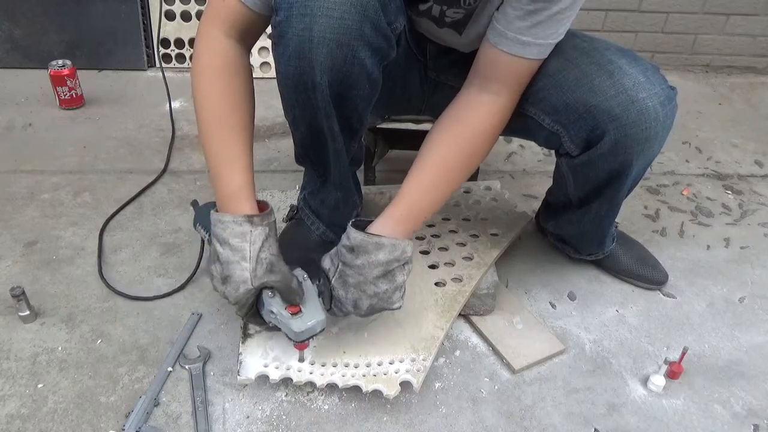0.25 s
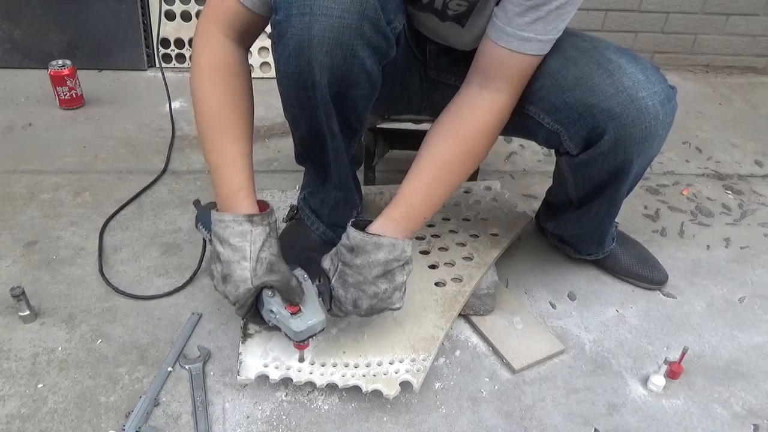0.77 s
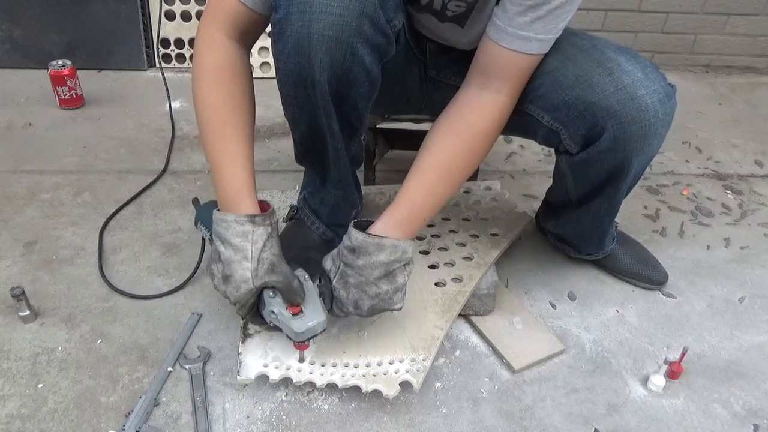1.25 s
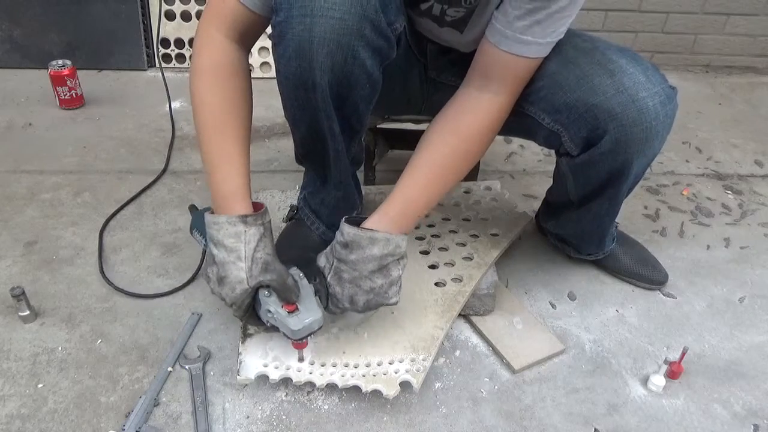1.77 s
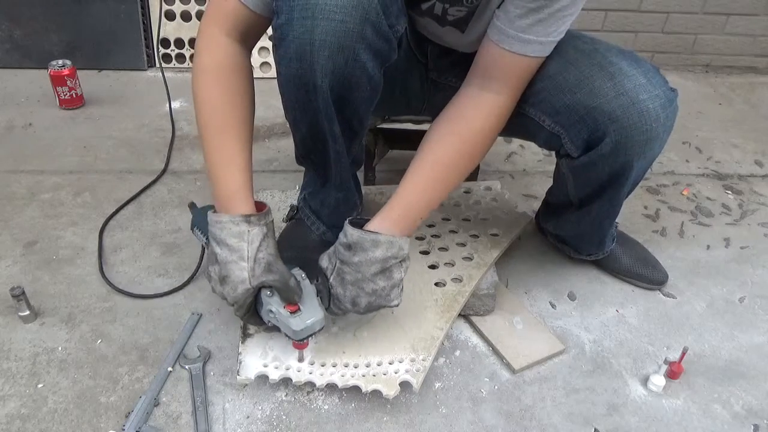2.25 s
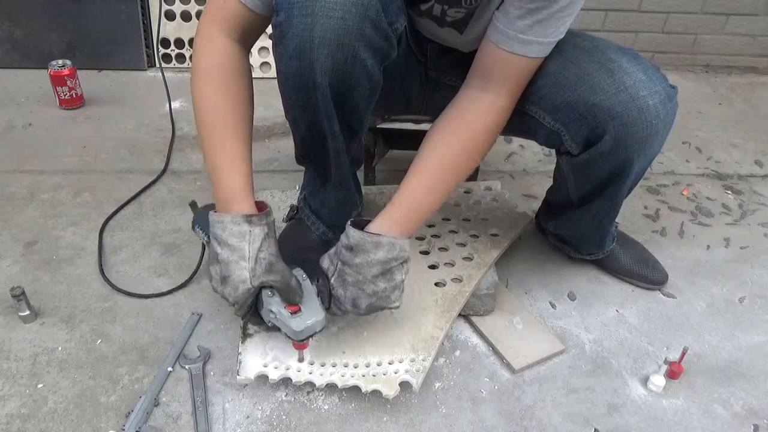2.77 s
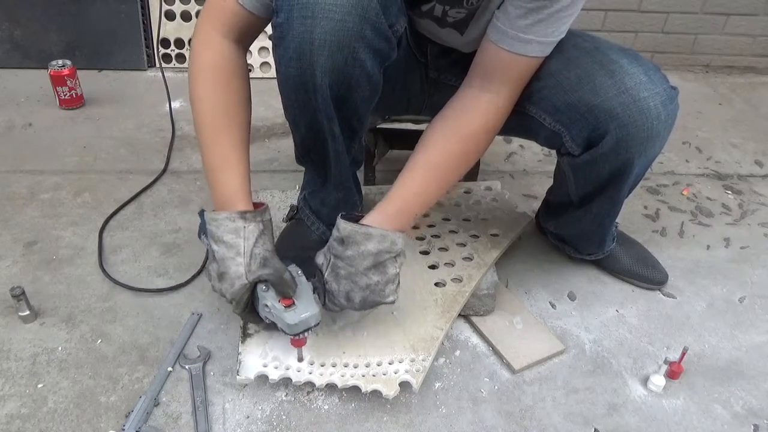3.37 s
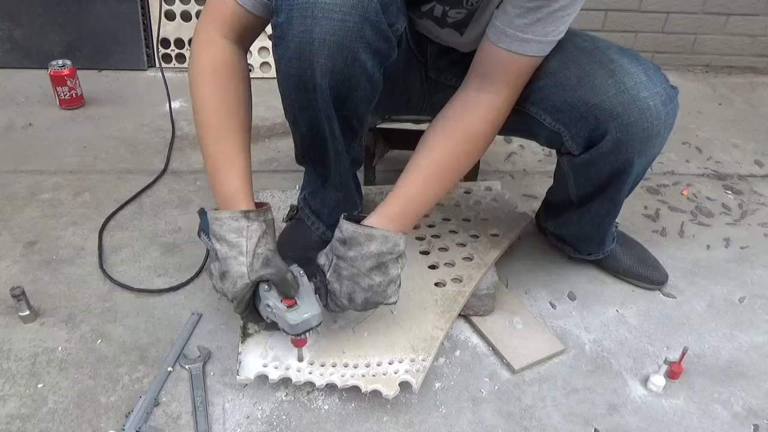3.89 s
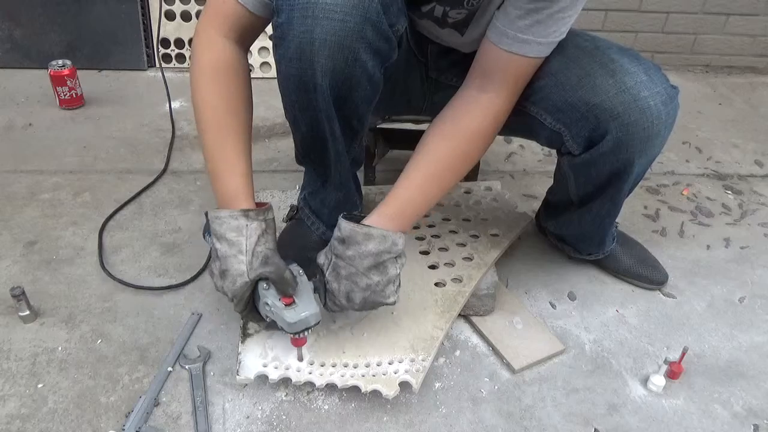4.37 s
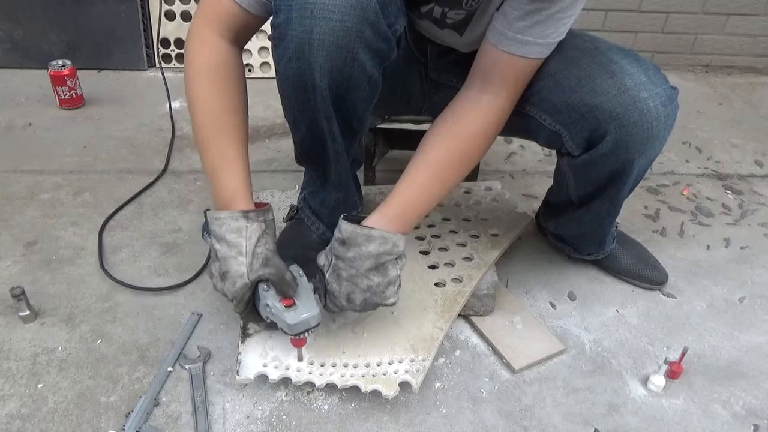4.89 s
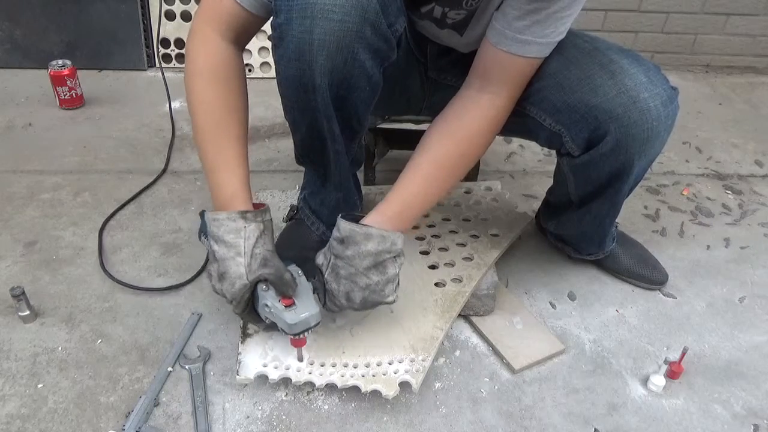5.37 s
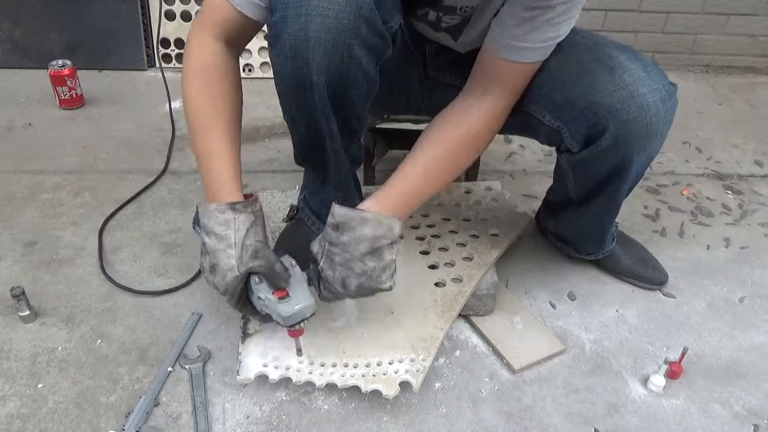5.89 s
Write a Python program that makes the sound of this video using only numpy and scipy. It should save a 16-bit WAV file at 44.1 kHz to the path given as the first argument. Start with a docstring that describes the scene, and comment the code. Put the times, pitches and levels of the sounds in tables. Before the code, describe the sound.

A continuous dense grinding screech: a diamond bit circling in ceramic tile, rough and metallic-bright, with small swells and dips, rattling and a noisy squeal over gear and fan hiss. After more than five seconds it bursts through; the tile suddenly stops ringing and the unloaded grinder whooshes on, louder in its hiss, with a brief light scrape. Close pickup in an open yard, levelled loudness, slight diffuse reflections from ground and wall.

```python
"""An angle grinder drives a diamond bit into a hard tile lying on concrete, in the open near a wall.
Grit scratches the tile into ringing (noise through resonators) as the tool is led round in small circles.
The bit rattles and squeals (noise-modulated lines); fan and gears hiss above (coloured noise).
Near the end the bit breaks through, grazes the hole and the tile falls silent; the freed tool hisses on."""
import sys
import numpy as np
from scipy import signal
from scipy.fft import rfft, irfft
from scipy.io import wavfile
from scipy.ndimage import uniform_filter1d

SR = 44100
rng = np.random.default_rng(int(sys.argv[2]) if len(sys.argv) > 2 else 0)


def wrap_up_sound(samples):
    """Save the sound to the file named by the first command line argument, as 16-bit audio."""
    columns = np.atleast_2d(samples).T
    # keep every value between -1 and 1, then stretch to whole-number steps
    tamed = np.clip(columns, -1, 1)
    steps = np.round(tamed * 32767).astype(np.int16)
    wavfile.write(sys.argv[1], SR, steps)


def voltage_ratio(level):
    """Linear amplitude factor for a level in decibels (scalar or array-like)."""
    return 10 ** (np.asarray(level, float) / 20)


N = 270774
T_S = np.arange(N) / SR
SPINDLE_HZ = 154.6
BREAK_S = 5.625  # the bit breaks through


def rms_one(x):
    """Scale to rms 1."""
    return x / np.sqrt(np.mean(x ** 2) + 1e-20)


def in_time(rows):
    """Interpolate the columns of a table that starts with time [s], one value per sample."""
    s, *columns = np.transpose(rows)
    return [np.interp(T_S, s, c) for c in columns]


def coloured(x, points, scale=1):
    """Filter by a spectrum of (frequency [Hz], level [dB]) points, the dB multiplied by scale."""
    hz, level_db = np.transpose(points)
    grid_hz = np.maximum(np.arange(N // 2 + 1) * SR / N, 1)
    gain_db = scale * np.interp(np.log(grid_hz), np.log(hz), level_db)
    return irfft(rfft(x) * voltage_ratio(gain_db), N)


def drift(corner_hz):
    """Slow random walk about 0 of spread 1: noise through two equal poles, drawn at SR / 40."""
    r = np.exp(-80 * np.pi * corner_hz / SR)
    slow = signal.lfilter([1], [1, -2 * r, r * r], rng.standard_normal(N // 40 + 2002))[2000:]
    return np.interp(np.arange(N) / 40, np.arange(len(slow)), rms_one(slow - slow.mean()))


def resonances(x, modes, waver_db, waver_hz):
    """Parallel resonators of alternating sign; each is fed more or less as the contact shifts."""
    out = np.zeros(N)
    for k, (hz, width_hz, level_db) in enumerate(modes):
        r = np.exp(-np.pi * width_hz / SR)
        b = np.array([1, 0, -1]) * (1 - r * r) / 2
        a = [1, -2 * r * np.cos(2 * np.pi * hz / SR), r * r]
        fed = x * voltage_ratio(level_db + waver_db * drift(waver_hz))
        out += (-1) ** k * signal.lfilter(b, a, fed)
    return out


def swing(circles, once_db, once_lag, twice_db, twice_lag):
    """Level change [dB] once and twice a circle as the tool leans round it; lags in circles."""
    once = once_db * np.cos(2 * np.pi * (circles - once_lag))
    return once + twice_db * np.cos(4 * np.pi * (circles - twice_lag))


def let_go():
    """Break-through: share 0-1 of the load taken off, and the loss of contact [dB], abrupt then fading."""
    free_s, let_go_s, loose_db, fade_db_per_s = .12, .012, -14, -38
    since_s = np.maximum(T_S - BREAK_S, 0)
    loss_db = loose_db * (1 - np.exp(-since_s / let_go_s)) + fade_db_per_s * since_s
    return 1 - np.exp(-since_s / free_s), loss_db


def grit(turns, memory, memory_hz, once, twice):
    """Scratch force: dense grains whose slower part recurs after two turns, pulsing once and twice a turn."""
    pattern_s = .0131
    force = rng.standard_normal(N) * voltage_ratio(2.0 * np.minimum(rng.exponential(1, N), 5))
    lag = round(pattern_s * SR)
    dull, state = np.exp(-2 * np.pi * memory_hz / SR), [0.]
    b = [np.clip(memory, 0, .9) * (1 - dull)]
    for i in range(lag, N, lag):
        back, state = signal.lfilter(b, [1, -dull], force[i - lag:i], zi=state)
        force[i:i + lag] += back[:N - i]
    return force * (1 + once * np.cos(2 * np.pi * turns) + twice * np.cos(4 * np.pi * turns))


def jolts():
    """Contact change [dB]: short bell-shaped swells and dips, early because the tile answers late."""
    # moments of changed contact: (time [s], level change [dB], mostly up)
    swells = [(.87, 6), (1.121, 2), (1.168, -4), (1.314, 1), (1.57, 3.5), (1.868, 2), (2.093, 2.5),
              (2.184, 4), (2.394, 0), (2.604, 2), (2.765, 2), (2.823, 3.5), (3.196, 6), (3.284, 1),
              (4.087, 4.5), (4.357, 4.5), (4.789, 1), (5.285, 3), (5.444, 4.5), (5.5, 5)]
    # moments of changed contact: (time [s], level change taken off [dB], mostly down)
    dips = [(.267, 0), (.365, 4), (.768, -2), (1.403, 7), (1.735, 8), (1.779, 3), (1.958, 1), (2.904, 1),
            (3.243, 6), (3.743, 6), (3.914, -2), (4.133, 4), (4.318, 4), (4.607, 3), (4.837, 6.5)]
    swell_sigma_s, dip_sigma_s, ring_lag_s = .008, .009, .004
    t = T_S + ring_lag_s
    added = sum(db * np.exp(-.5 * ((t - s) / swell_sigma_s) ** 2) for s, db in swells)
    taken_off = sum(db * np.exp(-.5 * ((t - s) / dip_sigma_s) ** 2) for s, db in dips)
    return added - taken_off


def grazes():
    """Bell-shaped gains for ring and rattle as the freed bit grazes the rim of the hole."""
    # (time [s], ring drive [dB], rattle [dB])
    touches = [(5.685, -44, -38), (5.777, -20.5, -35), (5.892, -45, -36.5)]
    sigma_s = .011
    s, ring_db, rattle_db = np.transpose(touches)[:, :, None]
    bell = np.exp(-.5 * ((T_S - s) / sigma_s) ** 2)
    return np.sum(voltage_ratio(ring_db) * bell, axis=0), np.sum(voltage_ratio(rattle_db) * bell, axis=0)


def chatter():
    """Grit loses its bite for an instant and finds it again: fast drift [dB], capped above."""
    depth_db, corner_hz, bite_s = .9, 36, .07
    fast = drift(corner_hz)
    fast = rms_one(fast - uniform_filter1d(fast, size=round(bite_s * SR)))
    return depth_db * np.minimum(fast, .8)


def ring(pressed, grazed, upper_db):
    """Tile modes driven by the scratch force, so the tile rings out after each swell of the force."""
    # pitches of the tile modes [Hz]
    mode_hz = [1300, 1365, 1450, 1530, 1605, 1675, 1790, 1991, 2190, 2290, 2350, 2415, 2600, 2750, 2890,
               3155, 3630, 3842, 4215, 4433, 4825]
    # the same modes: (width [Hz], relative level [dB])
    mode_shapes = [(44.7, -11.5), (35.8, -4.5), (69.4, -3), (69.4, 0.5), (49.7, 1.5), (46.6, -0.5),
                   (131, -6), (46.5, -1), (109, -16.5), (59.6, -0.5), (59.7, -4), (60.6, -1), (358, -12),
                   (34, -5), (36, -7.5), (34.8, -9.5), (100, -13), (125, -8.5), (80, -17), (35.3, -9),
                   (45, -13.5)]
    graze_upper, dulling_db_per_s = .3, -.8  # share of a graze in the upper modes; the hole deepens
    modes = [(hz, *shape) for hz, shape in zip(mode_hz, mode_shapes)]
    lower = resonances(pressed + grazed, modes[:7], waver_db=.5, waver_hz=14)
    tilted = voltage_ratio(upper_db) * pressed + graze_upper * grazed
    # separate sums leave valleys beside the 2 kHz mode and between modes 16 and 17
    upper = sum(resonances(tilted, group, waver_db=1.16, waver_hz=9.7)
                for group in (modes[7:8], modes[8:16]))
    top = sum(resonances(tilted, [mode], waver_db=1.6, waver_hz=9.4) for mode in modes[16:18])
    dulled = voltage_ratio(dulling_db_per_s * (T_S - N / 2 / SR)) * tilted
    highest = resonances(dulled, modes[18:], waver_db=1.8, waver_hz=10)
    return lower + upper + top + highest


def rattle(force):
    """Low modes of the tile, knocked by the bit; rms 1."""
    # (frequency [Hz], width [Hz], relative level [dB])
    slab = [(228, 8, -27), (294, 11.4, -21.5), (388, 19, -13), (416, 43, -12.5), (461, 21, -7),
            (542.6, 33, -4.5), (607.3, 31, -1.5), (677, 47, -6.5), (776, 39, -6.5), (827, 46, -11),
            (914, 27, -1.5), (986, 42, -7), (1060, 27, -1), (1122, 72, -9.5), (1237, 66, -0.5)]
    # separate sums leave a valley above the 914 Hz mode
    return rms_one(sum(resonances(force, group, waver_db=1.5, waver_hz=6.9)
                       for group in (slab[:11], slab[11:])))


def tile(turns, circles):
    """Scratch force sets off ring and rattle, each following the contact of the bit."""
    # pressure of the cut: (time [s], ring drive [dB], upper modes against lower [dB])
    cut_course = [(0, -23, 0.5), (.5, -23, 1.5), (.62, -25, 1), (1.1, -22.5, -1), (1.7, -23, -1),
                  (2.5, -25, -0.5), (2.72, -23, 0.5), (2.8, -24, 2.5), (2.9, -24.5, -1), (3.4, -25, 2),
                  (3.75, -26, 0), (4.1, -24, -0.5), (4.3, -25.5, .5), (4.75, -23, -1), (5.16, -24, -0.5),
                  (5.195, -29, 1), (5.23, -25.5, 3), (5.3, -25.5, 1), (5.33, -26, 3.5), (5.55, -28.5, -3),
                  (5.62, -25, -1)]
    ring_ref_db, rattle_ref_db, rattle_follows = -24.5, -32.5, .51
    cut_db, upper_db = in_time(cut_course)
    loss_db, jolt_db = let_go()[1], jolts()
    graze_ring, graze_rattle = grazes()
    ring_db = cut_db + loss_db + swing(circles, .4, 0, .9, .12) + chatter() + jolt_db
    rattle_db = rattle_ref_db + rattle_follows * (cut_db - ring_ref_db) + .58 * loss_db
    rattle_db = rattle_db + .5 * jolt_db + swing(circles, 1.1, -.15, .4, .05)
    upper_db = upper_db + swing(circles, .3, .25, .2, .1)
    force = rms_one(grit(turns, memory=.25, memory_hz=2200, once=.19, twice=.25))
    drive = voltage_ratio(19.5) * force
    ringing = ring(drive * voltage_ratio(ring_db), drive * graze_ring, upper_db)
    return ringing + (voltage_ratio(rattle_db) + graze_rattle) * rattle(force)


def squeal(circles):
    """A pair of modes of the bit, slipping and sticking: noise-modulated lines about 32 Hz wide."""
    # main line: (time [s], frequency [Hz])
    pitch_course = [(0, 9945), (1.7, 9945), (2.1, 9920), (3.8, 9895), (5.2, 9920), (5.7, 9895)]
    # main line: (time [s], level [dB])
    level_course = [(0, -28), (.9, -33), (1.3, -29.5), (1.9, -29), (2.3, -23.5), (2.6, -29), (3.6, -26.5),
                    (5.2, -25.5), (5.7, -25.5)]
    swing_hz, lag_circles, lower_db = 14, .43, -33.5
    hz, = in_time(pitch_course)
    level_db, = in_time(level_course)
    hz = hz + swing_hz * np.cos(2 * np.pi * (circles - lag_circles))
    low_pass = signal.butter(1, 16, fs=SR, output="sos")
    real, imag = signal.sosfilt(low_pass, rng.standard_normal((2, 2, N)))
    phase = 2 * np.pi * np.cumsum([hz, hz - 115], axis=1) / SR
    main, lower = real * np.cos(phase) + imag * np.sin(phase)
    shallow = np.clip((2.1 - T_S) / .27, 0, 1)  # the lower line dies as the hole deepens
    cutting = np.clip((pitch_course[-1][0] - T_S) / .036, 0, 1)
    return voltage_ratio(level_db) * cutting * rms_one(main) + voltage_ratio(lower_db) * shallow * rms_one(lower)


def air_hiss():
    """Coloured noise whose bands flicker apart; unloaded, brighter on top and thinner below."""
    # (frequency [Hz], relative density [dB per Hz])
    spectrum = [(30, -36.5), (100, -35), (160, -34.5), (255, -29), (500, -23), (800, -18), (1050, -15),
                (1400, -10.5), (3300, -7), (4600, -9.5), (5150, -4.5), (5750, -7.5), (6300, -3), (6600, 1),
                (7000, -3), (7500, -5), (9000, -2.5), (11500, -1.5)]
    free_top_db, free_low_db, dip_hz, dip_share = 1.5, -4, (620, 1150), .45
    free = let_go()[0]
    air = rms_one(coloured(rng.standard_normal(N), spectrum))
    edges_hz = [900, 3240, 5740, 8100, 10400]
    lows = [signal.sosfilt(signal.butter(2, hz, fs=SR, output="sos"), air) for hz in edges_hz]
    parts = np.diff([0 * air, *lows, air], axis=0)
    air = sum(part * voltage_ratio(.4 * drift(5.7) + 1.7 * drift(28)) for part in parts)
    air = air + (voltage_ratio(free_top_db * free) - 1) * parts[-1]
    air = air + (voltage_ratio(free_low_db * free) - 1) * parts[0]
    dip_band = signal.butter(1, dip_hz, "band", fs=SR, output="sos")
    return air - dip_share * free * signal.sosfilt(dip_band, air)


def gear_whistles():
    """Faint whistles of the gear case: noise through single narrow resonators."""
    # pitches of the whistles [Hz]
    whistle_hz = [5350, 6030, 7780, 8180, 9740, 10520]
    # the same whistles: (width [Hz], level [dB])
    whistle_shapes = [(60, -40.5), (50, -37), (120, -39), (50, -38.5), (90, -35), (150, -30.5)]
    return sum(voltage_ratio(db) * rms_one(resonances(rng.standard_normal(N), [(hz, width_hz, 0)], 1.5, 5))
               for hz, (width_hz, db) in zip(whistle_hz, whistle_shapes))


def motor(turns, circles):
    """Fan and gear hiss throbbing twice a turn, louder once the load is gone, plus whistles."""
    loaded_db, free_rise_db = -14.5, 4
    level_db = loaded_db + free_rise_db * let_go()[0] + swing(circles, .3, -.3, .3, -.16)
    throb = 1 + .061 * np.cos(4 * np.pi * turns)
    return voltage_ratio(level_db) * air_hiss() * throb + gear_whistles()


def spindle_hum(turns, circles):
    """Unbalanced spindle heard through the bit: wavering sines at once and twice the turn rate."""
    once_ref_db, twice_ref_db = -65, -53.5
    free_db, thinning_s = 3, .2  # swell while the last layer thins
    clear_s, clear_db_per_s = 5.64, -50  # hums on in the hole until the bit is clear of it
    once_db = once_ref_db + free_db * np.clip((T_S - BREAK_S) / thinning_s + 1, 0, 1)
    once_db = once_db + clear_db_per_s * np.maximum(T_S - clear_s, 0)
    once_db = once_db + swing(circles, 1.5, .53, 1, -.06) + 1.1 * drift(1.6)
    twice_db = twice_ref_db + 1.3 * let_go()[1] + swing(circles, 3.2, .47, 3.6, .29)
    twice_db = twice_db + 2.4 * drift(12) + 1.8 * drift(5)
    return voltage_ratio(once_db) * np.sin(2 * np.pi * turns) + voltage_ratio(twice_db) * np.sin(4 * np.pi * turns)


def flutter():
    """Lumpy low noise through two resonators that sets in at the break-through."""
    # (frequency [Hz], width [Hz], relative level [dB])
    lumps = [(236, 49, 1), (288, 50, -1.5)]
    level_db = -58.5
    noise = resonances(rng.standard_normal(N), lumps, waver_db=0, waver_hz=12)
    return voltage_ratio(level_db) * let_go()[0] * rms_one(noise)


def yard(x):
    """Scattered reflections off ground and wall: decaying noise, whitened to have no colour of its own."""
    t60_s, wall_s = .45, .015  # decay, delay of the first reflection
    t = np.arange(round(.5 * SR)) / SR
    tail = rfft(rng.standard_normal(len(t)) * voltage_ratio(-60 * t / t60_s) * (t > wall_s))
    running = np.concatenate([x[len(t):0:-1], x])  # the tool is already running
    return signal.fftconvolve(running, irfft(tail / np.abs(tail), len(t)))[len(t):len(t) + N]


def scene():
    """All sources sit in the centre; reflections of opposite sign left and right widen them."""
    # the hands pass the same point of their circle: (time [s], circles done [count])
    circle_course = [(-.39, 0), (.6, 2), (1.57, 4), (2.54, 6), (3.49, 8), (4.48, 10), (5.45, 12),
                     (6.42, 14)]
    # (frequency [Hz], left-right difference against the centre [dB])
    side_spectrum = [(30, -29), (80, -17), (170, -13.5), (300, -11.5), (700, -17), (950, -15),
                     (1250, -14.5), (1450, -21), (1750, -20), (2800, -16.5), (4100, -15), (5700, -16),
                     (6500, -19), (7400, -15.5), (9300, -14.5), (9900, -20), (11000, -18)]
    # (frequency [Hz], left over right [dB])
    balance = [(2000, 0), (5000, .8), (10300, .9), (11000, -.6)]
    turns = np.cumsum(SPINDLE_HZ * (1 + .0035 * drift(2.6))) / SR
    circles, = in_time(circle_course)
    centre = tile(turns, circles) + squeal(circles) + motor(turns, circles)
    centre = centre + spindle_hum(turns, circles) + flutter()
    side = coloured(yard(centre), side_spectrum)
    left = coloured(centre + side, balance, scale=.5)
    right = coloured(centre - side, balance, scale=-.5)
    return np.array([left, right])


def gain_control(x, hold_db, share, time_s):
    """Swells above the held level are partly pressed down, dips partly lifted."""
    r = np.exp(-1 / (time_s * SR))
    power = signal.lfilter([1 - r], [1, -r], np.mean(x ** 2, axis=0), zi=[voltage_ratio(2 * hold_db)])[0]
    return x * voltage_ratio(-np.clip(share, 0, .9) * (10 * np.log10(power) - hold_db))


def roll_off(x):
    """The treble ends steeply here."""
    return signal.sosfilt(signal.butter(12, 12240, fs=SR, output="sos"), x)


def record(dry):
    """Fast gain control, then a very steep cut of the top."""
    held = gain_control(dry, hold_db=-13, share=.64, time_s=.0028)
    cut = signal.sosfilt(signal.ellip(14, .3, 75, 11010, fs=SR, output="sos"), held)
    return roll_off(cut)


dry = scene()
out = record(dry)
wrap_up_sound(out)
```